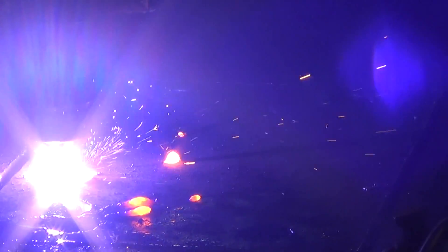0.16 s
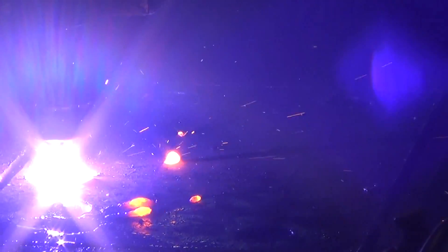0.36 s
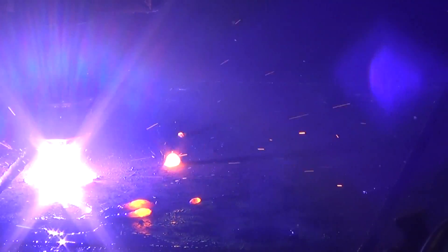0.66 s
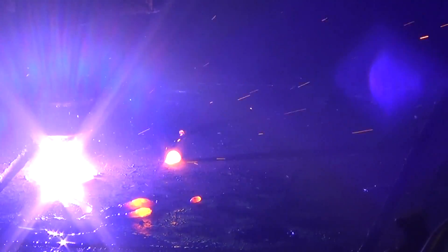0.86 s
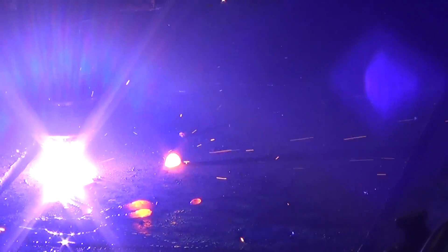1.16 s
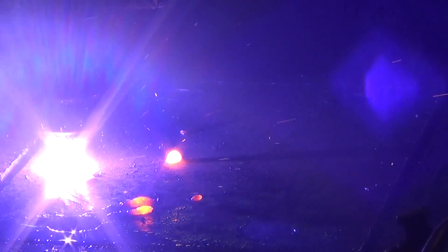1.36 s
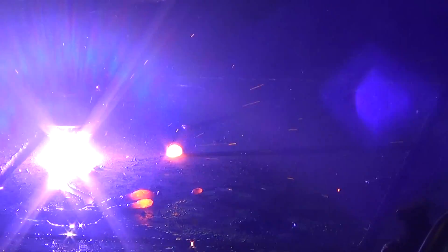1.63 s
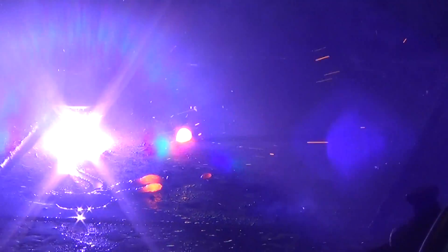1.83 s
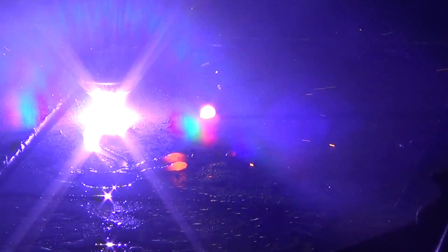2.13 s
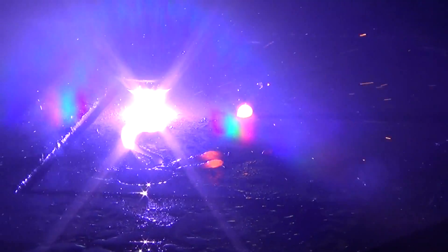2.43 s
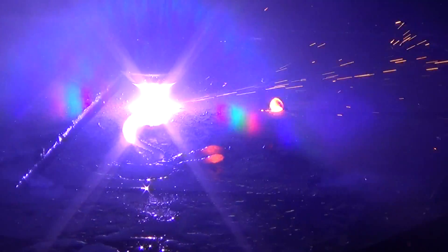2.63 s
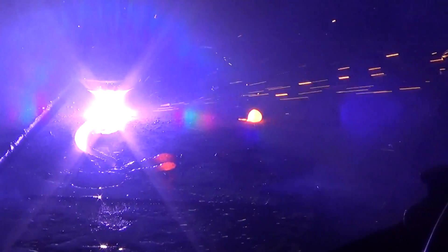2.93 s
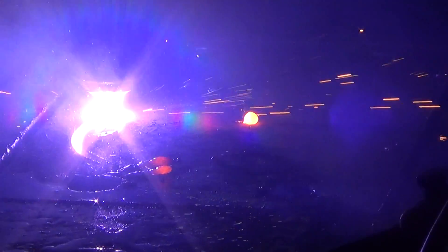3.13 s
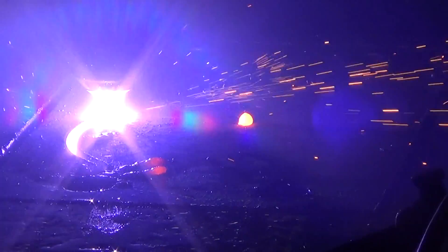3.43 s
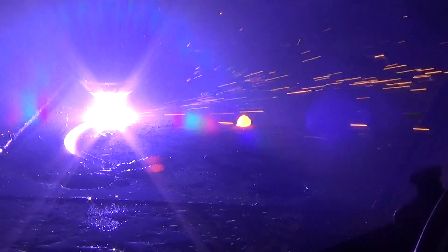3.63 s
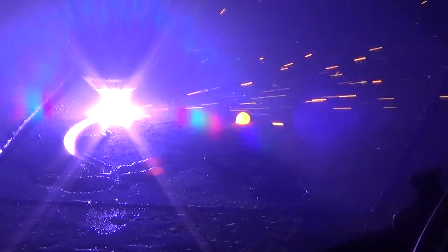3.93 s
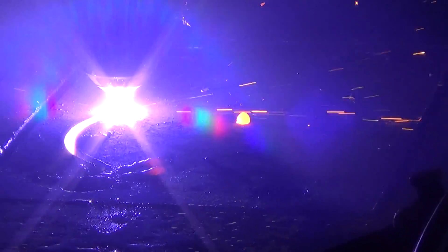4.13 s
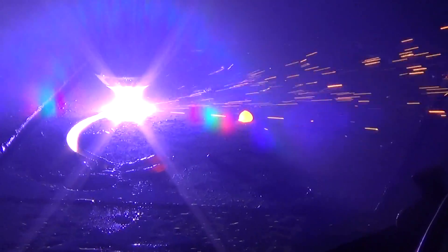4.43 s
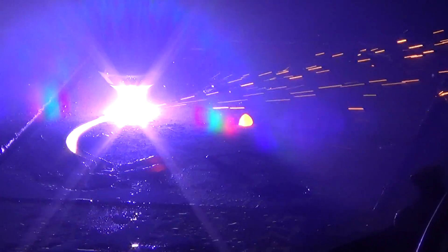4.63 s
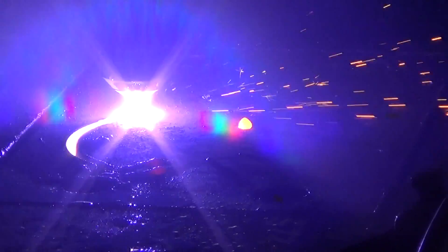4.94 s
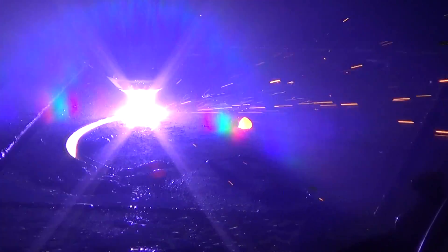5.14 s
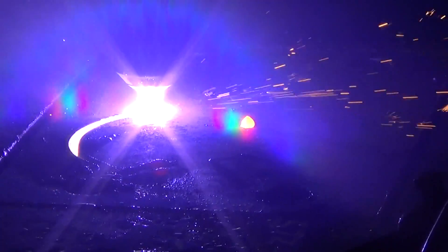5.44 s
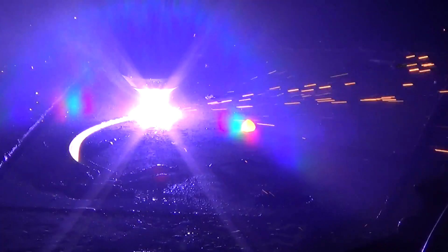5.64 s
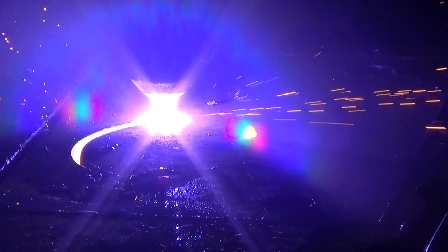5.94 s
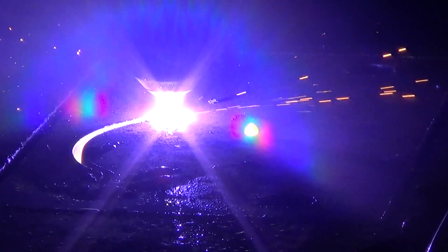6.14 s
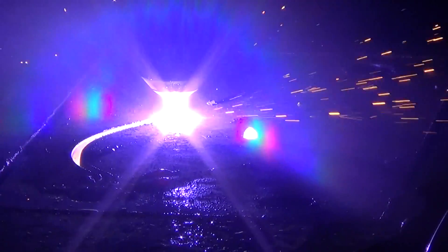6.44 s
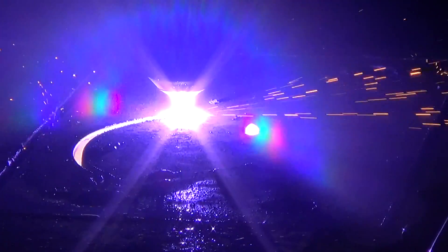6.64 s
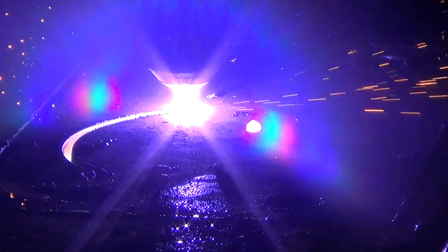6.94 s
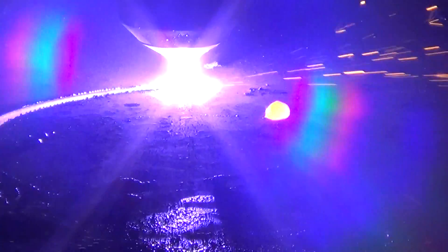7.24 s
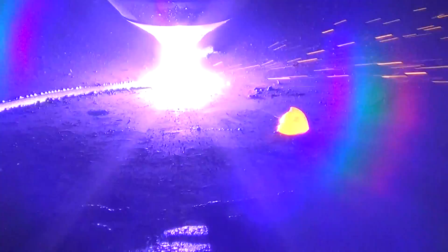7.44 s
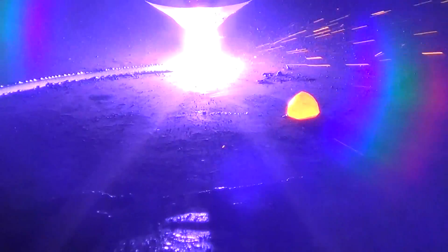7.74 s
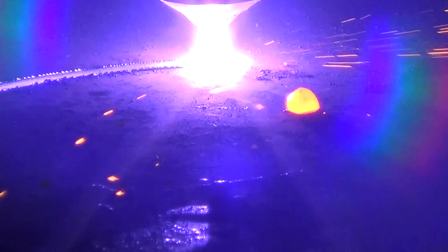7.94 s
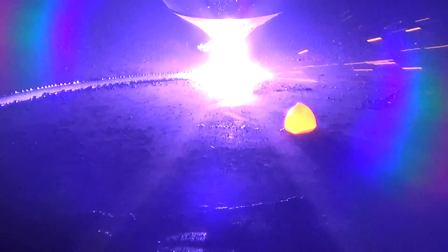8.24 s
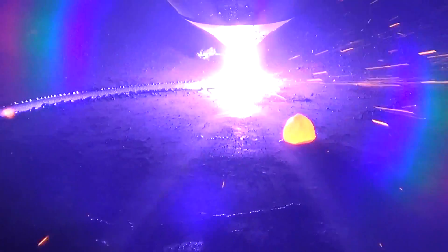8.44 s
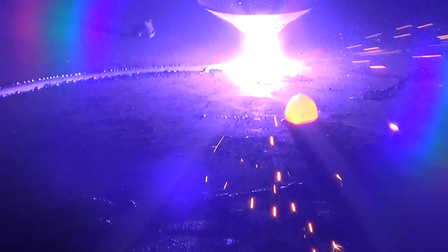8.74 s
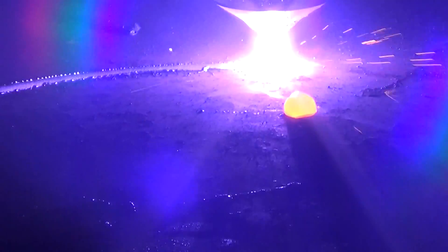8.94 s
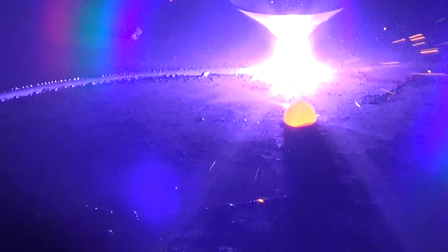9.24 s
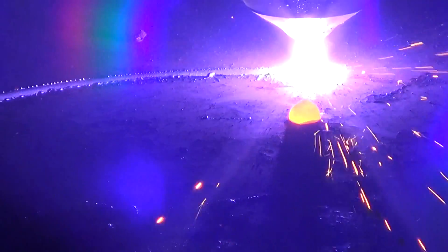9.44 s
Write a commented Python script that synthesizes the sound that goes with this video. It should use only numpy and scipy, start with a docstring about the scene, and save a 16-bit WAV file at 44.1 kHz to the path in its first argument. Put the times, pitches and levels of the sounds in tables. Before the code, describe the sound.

Close to a plasma torch cutting steel plate in a workshop. A loud, sharp jet hiss runs without pause, brightest at the very top, with a rougher fluttering roar of gas and melt beneath. A hollow ringing under the plate slowly changes pitch as the torch travels. Cooling fans and a motor hum faintly behind. The stereo microphone is near and slightly overloaded.

```python
"""A gas jet hisses, strongest near 10 kHz: a plasma torch cuts steel plate in a workshop.
Below the hiss a flickering roar comes out of the cut and rings the hollow under the plate, whose
resonances change as the torch travels. Cooling fans beat against each other and a motor hums.
Jet, cut and rumble are shaped noise; fans and motor are sums of cosines; reflections comb the torch."""
import sys
import numpy as np
from scipy import signal
from scipy.fft import rfft, irfft, next_fast_len
from scipy.io import wavfile
from scipy.ndimage import uniform_filter1d, map_coordinates

SR = 44100
rng = np.random.default_rng(int(sys.argv[2]) if len(sys.argv) > 2 else 0)


def pcm_store(signal):
    """Save signal as 16-bit PCM."""
    levels = np.round(np.clip(np.atleast_2d(signal), -1, 1) * 32767)
    wavfile.write(sys.argv[1], SR, levels.astype(np.int16).T)


N = 422919


def amp(db):
    """dB to gain."""
    return 10 ** (np.asarray(db) / 20)


def unit(x):
    """Scaled to rms 1."""
    return x / np.sqrt(np.mean(x ** 2) + 1e-20)


def along(points, hz):
    """Interpolates (Hz, value) points on a log frequency axis."""
    point_hz, value = np.transpose(points)
    return np.interp(np.log(hz + 1), np.log(point_hz + 1), value)


def curves(rows):
    """One value per sample for each column after the time."""
    time_s, *columns = np.transpose(rows)
    return [np.interp(np.arange(N) / SR, time_s, column) for column in columns]


def wobble(rate_hz):
    """Smooth random curve through normal knots, rate_hz knots a second."""
    knots = rng.standard_normal(int(N * rate_hz / SR) + 4)
    return map_coordinates(knots, [np.arange(N) * rate_hz / SR])


def filtered(x, response):
    """Applies a zero-phase gain given as a function of Hz."""
    size = next_fast_len(N + 8192)
    gain = response(np.fft.rfftfreq(size, 1 / SR))
    return irfft(rfft(x, size) * gain, size)[..., :N]


def lift(modes, hz):
    """Gain of summed bell-shaped dB rises (Hz, width Hz, dB)."""
    return amp(sum(db / (1 + (2 * (hz - centre) / width) ** 2) for centre, width, db in modes))


# left-right correlation: (frequency [Hz], likeness [0..1])
LIKENESS = [(60, 1), (200, 1), (380, 0.98), (700, 0.94), (1290, 0.84), (2380, 0.97), (4400, 0.91),
            (8120, 0.93), (11000, 0.985), (11700, 1), (12300, 1)]


def rush(spectrum, patchy_db, frames=5):
    """Stereo turbulence of rms 1: shaped noise with random gain patches, frames of 6 ms long."""
    z = signal.stft(rng.standard_normal((2, N)), nperseg=512)[2]
    patches = uniform_filter1d(rng.standard_normal(z.shape[1:]), size=5, axis=0)
    patches = unit(uniform_filter1d(patches, size=frames, axis=1))
    pair = signal.istft(z * amp(patchy_db * patches), nperseg=512)[1][:, :N]

    def mid_side_gain(hz):
        angle = np.arccos(np.clip(along(LIKENESS, hz), 0, 1)) / 2
        return amp(along(spectrum, hz)) * [np.cos(angle), np.sin(angle)]

    mid, side = filtered(pair, mid_side_gain)
    return unit(np.array([mid + side, mid - side]))


# air rumble: (time [s], level [dB])
RUMBLE_LEVEL = [(0, -51.5), (.9, -49.5), (2.75, -49), (3.31, -53), (4.83, -50.5), (5.95, -55.5), (7.1, -56),
                (7.53, -57), (7.95, -53), (8.4, -55), (9.11, -51), (9.59, -53.5)]
# its colour: (frequency [Hz], relative level [dB per Hz])
RUMBLE_COLOUR = [(20, -24), (50, -14), (100, -12), (200, -3.5), (320, 1.5), (450, -11), (1000, -90)]
# motor, mains and fan blades:
# (frequency when in step [Hz], rms before the hum swing [dB], left minus right [dB], drift [Hz/s])
STEADY_TONES = [(69.0, -78.9, 0.1, 0), (103.52, -72.5, 0, 0), (120.02, -71.9, 0, 0), (137.98, -69.6, 0, 0),
                (362.438, -62.5, 0, .0577), (367.993, -55.7, -1.5, .0363), (368.957, -55.8, -1.9, -.0103),
                (372.315, -55.7, -.5, .0779), (583.53, -62.5, -3.0, 0), (722.18, -55, -2.7, 0)]
IN_STEP_S = 8.896  # all tones in phase


def shop():
    """Air rumble and tones that swell with it; fans of nearly equal speed beat slowly."""
    rumble_db, = curves(RUMBLE_LEVEL)
    hum_swing_db = .7 * (rumble_db - rumble_db.mean()) + .5
    t = np.arange(N) / SR - IN_STEP_S
    hum = np.zeros((2, N))
    for hz, rms_db, pan_db, drift_hz_per_s in STEADY_TONES:
        gain = np.sqrt(2) * amp(rms_db + np.array([[pan_db], [-pan_db]]) / 2)
        hum += gain * np.cos(2 * np.pi * (hz + drift_hz_per_s * t / 2) * t)
    return amp(rumble_db) * rush(RUMBLE_COLOUR, patchy_db=-1.0) + amp(hum_swing_db) * hum


# each bounce off benches and walls: (frequency [Hz], gain re direct [dB])
BOUNCE_GAIN = [(300, -34), (1000, -27), (2000, -22), (4000, -20), (15000, -20.5)]


def bounced(x, count):
    """Weak early bounces ripple the spectrum finely; their paths creep while the torch travels."""
    hz, t, z = signal.stft(x, SR, nperseg=2048, noverlap=1536)
    lag_s = rng.uniform(.003, .016, count)
    creep_s_per_s = rng.uniform(-.00012, .00012, count)
    gain = amp(along(BOUNCE_GAIN, hz))[:, None]
    copies = sum(np.exp(-2j * np.pi * hz[:, None] * (lag + creep * t))
                 for lag, creep in zip(lag_s, creep_s_per_s))
    z = z * (1 + gain * copies) / np.sqrt(1 + count * gain ** 2)
    return signal.istft(z, SR, nperseg=2048, noverlap=1536)[1][:, :N]


def passing(x, bands, size):
    """Lifts or cuts each band while it lasts, sliding from its first to its last frequency."""
    fade_s = 0.15
    hz, t, z = signal.stft(x, SR, nperseg=size)
    db = np.zeros(z.shape[1:])
    for start, end, first, last, width, lift_db in bands:
        on = (np.tanh((t - start) / fade_s) - np.tanh((t - end) / fade_s)) / 2
        centre = np.interp(t, [start, end], [first, last])
        db += lift_db * on * .5 ** ((2 * (hz[:, None] - centre) / width) ** 2)
    return signal.istft(z * amp(db), SR, nperseg=size)[1][:, :N]


# brief dips and surges of the blast through the slot: (time [s], change [dB])
BLAST_CHANGES = [(.1, -1.5), (.37, -2), (1.79, 2.5), (2.72, 2), (5.4, -1.5), (5.557, -1), (5.73, -2),
                 (5.82, 2.5), (5.92, -3), (5.98, 2), (6.016, 1.5), (6.092, -0.5), (6.13, -2.5), (6.202, 3),
                 (6.245, -1.5), (6.42, -2), (6.472, 0), (6.66, 2.5), (6.737, -1.5), (6.81, -0.5),
                 (6.99, -3), (7.082, 2), (7.22, -3), (7.413, 2.5), (7.485, -3), (7.535, -4), (7.795, -2),
                 (7.853, -5.5), (8.016, -2.5), (8.523, -2), (8.62, -0.5), (8.673, -3)]


def sputter():
    """The dips and surges as one dB curve of Gaussian bumps."""
    half_width_s = 0.015  # to 1/e
    t = np.arange(N) / SR
    return sum(db * np.exp(-((t - time_s) / half_width_s) ** 2) for time_s, db in BLAST_CHANGES)


# (time [s], roar level [dB], hollow level before a 2.5 dB trim [dB])
CUT_LEVELS = [(0, -27, -35), (.7, -26.5, -36), (1.25, -27.5, -37.5), (1.55, -26.5, -35.5),
              (2.35, -25.5, -35.5), (3.0, -27, -37), (3.6, -27, -38), (4.4, -26.5, -36), (5.2, -27.5, -37),
              (5.6, -28, -37.5), (6.2, -29.5, -38), (6.7, -28, -35.5), (7.35, -29.5, -39),
              (8.1, -26.5, -35.5), (8.45, -27.5, -36.5), (8.7, -28, -37), (9.05, -25.5, -34),
              (9.59, -26.5, -34.5)]
# colour of the roar: (frequency [Hz], relative level [dB per Hz])
ROAR_COLOUR = [(400, -90), (1100, -27), (1700, -8.5), (2500, -7.5), (3300, -6), (4400, -3), (5600, -1),
               (6800, -3.5), (12000, -90)]
# colour of the hollow: (frequency [Hz], relative level [dB per Hz])
HOLLOW_COLOUR = [(100, -90), (250, -30), (380, -4.5), (520, -1.5), (850, -2.5), (1100, -2.5), (1500, -2.5),
                 (2200, -27), (5000, -90)]
# bands that plate, nozzle and room favour or cancel throughout: (frequency [Hz], width [Hz], lift [dB])
PLATE_MODES = [(3020, 280, 2.5), (3840, 530, 4.5), (4610, 190, 3.5), (5030, 270, 4), (3240, 120, -1),
               (2720, 88, -2), (4440, 92, -0.5)]
# steady room modes on the hollow: (frequency [Hz], width [Hz], lift [dB])
ROOM_MODES = [(403, 10, -3), (422, 16, 5), (442, 14, -5), (462, 16, 3), (800, 40, -2)]
# resonances and nulls of plate and hollow that come and go as the torch travels:
# (start [s], end [s], first frequency [Hz], last frequency [Hz], width [Hz], lift [dB])
PASSING_MODES = [(0, 1.3, 628, 626, 36, 7.5), (1.4, 3.6, 632, 628, 36, 10), (0, 3.4, 768, 772, 30, 5),
                 (0, 2, 1048, 1048, 22, 4), (0, 3.4, 880, 925, 50, -2.5), (0, 3.4, 1020, 1022, 25, -3),
                 (3.7, 8.6, 805, 805, 40, 2.5), (.3, 3.3, 675, 695, 70, 5), (1.3, 1.8, 760, 760, 35, 5),
                 (3.5, 5.45, 740, 755, 65, 8), (5.65, 6.3, 750, 740, 60, 7.5), (6.4, 7.25, 725, 740, 55, 9),
                 (7.4, 8.6, 725, 745, 60, 8), (8.8, 9.7, 735, 732, 45, 10), (0, 1, 500, 500, 35, 4),
                 (3.8, 5.4, 556, 556, 22, 7), (3.8, 5.3, 520, 485, 35, 4), (3.8, 9.7, 608, 610, 22, 4),
                 (3.8, 8.5, 632, 640, 25, -2), (8.5, 9.7, 665, 665, 40, -4), (5.5, 8, 527, 525, 25, 4),
                 (5.4, 9.7, 890, 890, 30, -3), (8.6, 9.7, 1040, 1040, 50, -4), (3.8, 5.3, 910, 912, 20, 3),
                 (7.9, 8.6, 520, 520, 40, 5), (8.85, 9.7, 566, 562, 30, 8), (8.9, 9.7, 518, 520, 35, 7),
                 (9.1, 9.7, 470, 470, 35, 9), (5.4, 6.6, 450, 450, 40, -6), (0, .7, 962, 962, 25, 8),
                 (1.4, 3.1, 960, 956, 16, 8), (2.4, 4.1, 880, 875, 70, -5), (4.2, 5.3, 980, 1000, 40, 6),
                 (7.9, 8.7, 928, 925, 20, 8), (8.1, 8.6, 985, 990, 25, 5), (8.8, 9.5, 925, 925, 22, 9),
                 (8.9, 9.5, 840, 830, 70, 7), (8.9, 9.5, 985, 985, 30, 7), (5.4, 6.6, 1090, 1085, 50, -8),
                 (7, 7.7, 1150, 1150, 70, -8), (0, 3.3, 1210, 1210, 40, 3), (0, 3.5, 1365, 1355, 38, 6),
                 (4, 7.5, 1405, 1430, 40, 6), (7.4, 9.5, 1385, 1370, 80, 7), (5.6, 7.6, 1460, 1470, 20, -3),
                 (0, 1.9, 1650, 1640, 45, 6), (1.9, 3.1, 1570, 1560, 60, 4),
                 (4.25, 4.75, 1795, 1795, 40, 9), (4.3, 4.8, 1670, 1670, 30, 5),
                 (7.7, 8.4, 1700, 1680, 70, 6), (0, 1.3, 3650, 3650, 300, 2),
                 (1.3, 3.5, 3800, 4050, 600, 1.5), (1.2, 3.2, 3050, 3050, 350, 2),
                 (0, 3, 5000, 5250, 450, 1), (0, 3.2, 5500, 5450, 300, -2), (5.4, 8, 3450, 3450, 300, -1),
                 (3.3, 5.5, 3160, 3160, 150, 3), (3.3, 5.5, 3550, 3550, 300, 1.5),
                 (5.2, 9.7, 1950, 1960, 90, 3), (5.2, 9.7, 2700, 2700, 120, 2),
                 (5.4, 9.7, 1820, 1820, 80, -2), (3.6, 5.4, 4300, 4200, 250, -2),
                 (5.4, 9.4, 4220, 4380, 330, -3), (5.4, 9, 2350, 2350, 500, -2),
                 (8.7, 9.7, 3150, 3150, 600, 2), (0, 3.4, 572, 568, 30, -4), (0, 3.4, 1135, 1135, 30, -4),
                 (.5, 3.4, 1280, 1275, 30, 4), (3.8, 8.5, 690, 690, 20, -2), (4.5, 8.5, 1125, 1125, 20, 4),
                 (4.5, 8, 1212, 1212, 20, 4), (5.2, 7.7, 922, 922, 18, 5)]


def cut():
    """Gas and melt blown through the slot; one flicker moves both the roar and the hollow."""
    roar_db, hollow_db = curves(CUT_LEVELS)
    flicker = 0.37 * wobble(14) + wobble(28) + 1.2 * wobble(55)
    blast_db = sputter()
    roar = unit(filtered(rush(ROAR_COLOUR, patchy_db=0.82), lambda hz: lift(PLATE_MODES, hz)))
    hollow = filtered(rush(HOLLOW_COLOUR, patchy_db=0.5), lambda hz: lift(ROOM_MODES, hz))
    roar = passing(amp(roar_db) * roar, PASSING_MODES, size=4096)
    hollow = passing(amp(hollow_db - 2.5) * hollow, PASSING_MODES, size=4096)
    return amp(blast_db + 0.41 * flicker) * roar + amp(1.1 * blast_db + 0.51 * flicker) * hollow


# the jet mirrored in the plate: (time [s], lag [ms], strength re direct [dB])
PLATE_MIRROR = [(0, .69, -9), (.6, .71, -9), (1.1, .79, -12), (1.8, .92, -16), (2.1, 1.03, -15),
                (2.7, 1.05, -17), (3.6, 1.045, -16), (4.1, 1.08, -10), (4.8, 1.13, -12), (5.4, 1.18, -12),
                (5.95, 1.215, -13), (6.5, 1.21, -19), (7.8, 1.19, -17), (8.6, 1.04, -14), (9.59, 1.05, -16)]


def mirrored(x):
    """A copy off the plate, about 1 ms late, combs x into bands that slide as the torch moves."""
    lag_ms, strength_db = curves(PLATE_MIRROR)
    late = np.arange(N) - lag_ms * SR / 1000
    gain = amp(strength_db)
    copy = np.array([map_coordinates(channel, [late], order=5) for channel in x])
    return (x + gain * copy) / np.sqrt(1 + gain ** 2)


# (time [s], core level [dB], lower flank level [dB])
JET_LEVELS = [(0, -22.5, -24.5), (.4, -22, -25), (1.0, -23, -24), (1.5, -23, -24.8), (2.0, -22, -25.5),
              (2.8, -23, -23.5), (3.1, -21, -24.8), (3.4, -26, -24), (4.05, -21, -24), (4.45, -24, -25),
              (5.1, -22, -23), (6.0, -20.5, -25.5), (6.5, -21.5, -24), (7.3, -20, -25), (7.9, -21, -22.5),
              (8.2, -23, -23.5), (8.6, -20.5, -21.5), (8.95, -24, -22), (9.59, -21, -23.5)]
# colour of the core: (frequency [Hz], relative level [dB per Hz])
CORE_COLOUR = [(5000, -90), (8800, -22), (9700, -4), (10500, -5.5), (11500, -4.5), (12600, -17),
               (15800, -64)]
# colour of the wide hiss: (frequency [Hz], relative level [dB per Hz])
HISS_COLOUR = [(4000, -90), (7800, -20), (9000, -5.5), (10500, 0), (12000, -1.5), (12800, -1.5),
               (14000, -7.5), (15000, -10.5), (15800, -11.5)]
# colour of the lower flank: (frequency [Hz], relative level [dB per Hz])
FLANK_COLOUR = [(2500, -90), (5000, -25), (6000, -8), (7200, -1.5), (8300, 0.5), (9300, -1.5), (10800, -39),
                (15000, -90)]
# narrow whistling ridges that drift through the jet:
# (start [s], end [s], first frequency [Hz], last frequency [Hz], width [Hz], lift [dB])
WHISTLE_RIDGES = [(.1, .6, 11480, 11480, 350, 2.5), (-.1, .55, 10050, 10200, 500, 2.5),
                  (.35, .75, 12450, 12400, 200, 4), (1.05, 1.5, 10550, 10400, 250, 4.5),
                  (1.4, 2, 9820, 9600, 220, 2), (3.45, 4.05, 10900, 10450, 400, 3.5),
                  (3.85, 4.35, 10200, 10200, 200, 4), (4.5, 5, 10800, 10600, 400, 3.5),
                  (4.55, 5.2, 11480, 11480, 200, 3), (5.1, 5.7, 10500, 10050, 400, 2.5),
                  (5.6, 6.2, 9920, 10170, 320, 2), (5.3, 6.4, 10950, 10600, 400, 3.5),
                  (6.4, 7.6, 11300, 11200, 400, 0.5), (5.55, 6.05, 12350, 12250, 250, 2),
                  (6.3, 6.9, 10250, 10200, 400, 2), (6.2, 7.8, 10600, 10500, 300, 1.5),
                  (6.85, 7.8, 10050, 9900, 300, 2), (7, 7.7, 10850, 10800, 300, 2),
                  (7.65, 8.3, 10300, 10300, 300, 3), (8.4, 8.8, 10380, 10900, 350, 3),
                  (8.45, 8.95, 11600, 11620, 300, 2.5), (8.1, 8.8, 9430, 9450, 200, 5),
                  (9.15, 9.7, 12300, 12400, 220, 3)]
HISS_DB, HISS_DRIFT_DB = -19.5, 0.63  # mean level and slow drift


def jet():
    """Bright mirrored core and wide hiss, streaked by ridges; the flank swells as the torch turns."""
    core_db, flank_db = curves(JET_LEVELS)
    flutter = wobble(25)
    core = amp(core_db + .5 * flutter) * mirrored(rush(CORE_COLOUR, patchy_db=1.3, frames=40))
    hiss_db = HISS_DB + HISS_DRIFT_DB * wobble(3.38) + 0.26 * flutter
    hiss = amp(hiss_db) * rush(HISS_COLOUR, patchy_db=1.5, frames=12)
    flank_db = flank_db + 0.3 * sputter() + 0.33 * wobble(25)
    flank = amp(flank_db) * rush(FLANK_COLOUR, patchy_db=1.5)
    return passing(core + hiss, WHISTLE_RIDGES, size=1024) + flank


def scene():
    """Shop, and the torch with its bounces."""
    return shop() + bounced(cut() + jet(), count=12)


# channel balance: (frequency [Hz], left minus right [dB])
CHANNEL_LEAN = [(200, 0), (380, -.6), (700, -.5), (2400, -.3), (4400, .3), (15000, 0)]
TOP_HZ = 15760


def record(dry):
    """Channels lean apart by frequency, the loudest peaks are rounded off, the band ends steeply."""
    leaning = filtered(dry, lambda hz: amp(np.array([[.5], [-.5]]) * along(CHANNEL_LEAN, hz)))
    rounded = leaning / (1 + abs(leaning / .75) ** 5) ** (1 / 5)  # saturates at .75
    return filtered(rounded, lambda hz: hz < TOP_HZ)


dry = scene()
out = record(dry)
pcm_store(out)
```